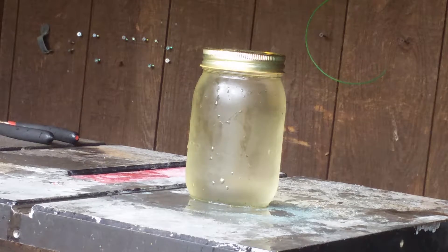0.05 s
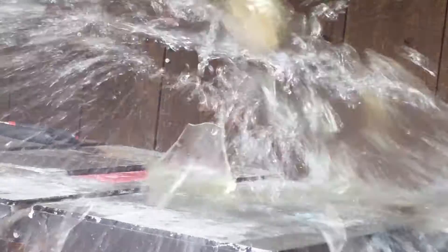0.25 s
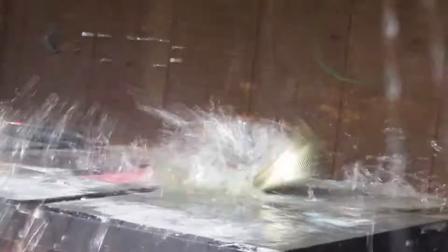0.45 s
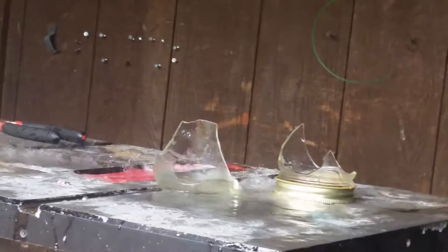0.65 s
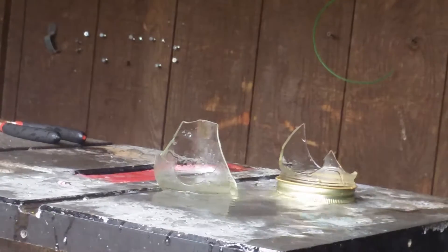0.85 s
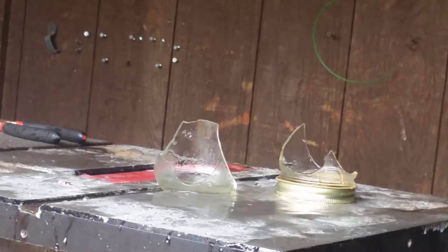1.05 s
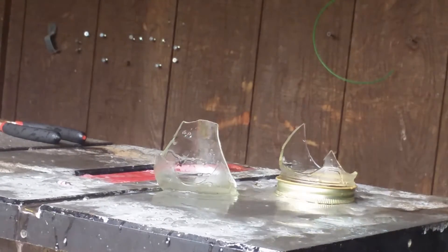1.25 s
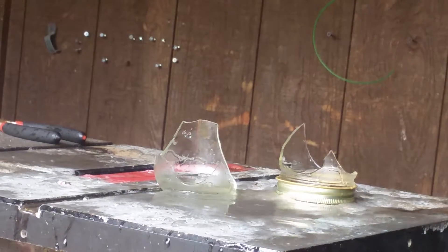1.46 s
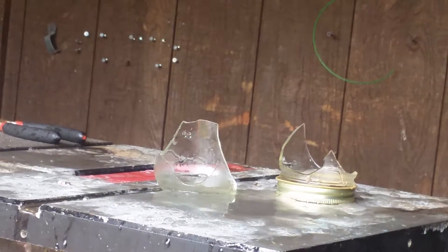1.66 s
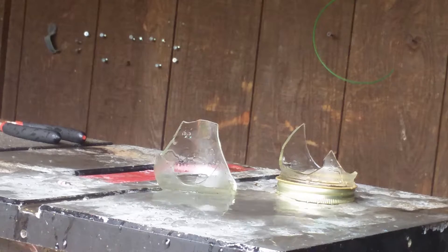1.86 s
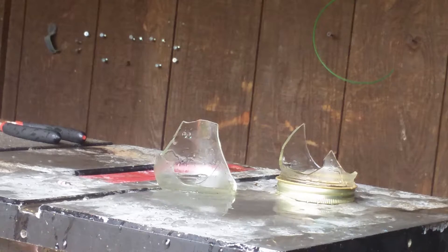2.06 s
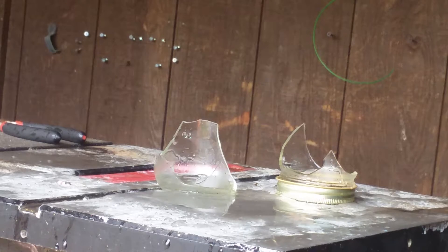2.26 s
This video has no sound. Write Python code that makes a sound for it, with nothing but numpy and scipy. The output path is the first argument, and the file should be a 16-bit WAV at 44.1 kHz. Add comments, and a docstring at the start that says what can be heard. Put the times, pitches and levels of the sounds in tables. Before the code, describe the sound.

A water-filled glass jar shatters at one loud, sharp gunshot in a yard. Water splashes, the table thumps, and bright bits of glass bounce and tinkle nearby, thinning out until only a faint outdoor rumble remains.

```python
"""A low outdoor rumble, then the crack of a bullet bursting a water-filled glass jar on a table.
Hit, blast and the slap off a wooden wall come as three noise bursts, with a spray of glass and water.
The lid and the water land and the table top booms; shards bounce and clink one by one, each ringing
in its own modes. The yard echoes. The rumble sinks after the shot and swells back at the end."""
import sys
import numpy as np
from scipy import signal
from scipy.fft import rfft, irfft
from scipy.io import wavfile

SR = 44100
rng = np.random.default_rng(int(sys.argv[2]) if len(sys.argv) > 2 else 0)


def master_out(mix):
    """Clip the mix to full scale and print it as 16-bit PCM to the path in sys.argv[1]."""
    frames = np.transpose(np.atleast_2d(mix))
    ceiling = np.clip(frames, -1, 1)
    pcm = np.round(ceiling * 32767).astype(np.int16)
    wavfile.write(sys.argv[1], SR, pcm)


N = 105840
TIME_S = np.arange(N) / SR
FREQS_HZ = np.maximum(np.fft.rfftfreq(N, 1 / SR), 1)
TOP_HZ, CONTACT_S = 15800, .0008


def undb(db):
    """Decibels to gain."""
    return 10 ** (np.asarray(db) / 20)


def pan(pan_db):
    """Stereo gains; pan_db is left minus right."""
    return undb(np.array([[pan_db], [-pan_db]]) / 2)


def decay(t60_s):
    """Exponential decay, N samples long."""
    return np.exp(-np.log(1000) * TIME_S / t60_s)


def curve_at(hz, points):
    """Interpolate (freq_hz, value) points over log frequency."""
    freqs_hz, values = np.array(points).T
    return np.interp(np.log(hz), np.log(freqs_hz), values)


def colour(x, spectrum):
    """Filter by a spectrum, keeping the power of white noise."""
    gain = undb(curve_at(FREQS_HZ, spectrum))
    return irfft(rfft(x) * gain / np.sqrt(np.mean(gain ** 2)), N)


def noise(alike_below_hz=780):
    """White stereo noise: sides alike in the bass, unrelated in the treble."""
    mid, side = rfft(rng.standard_normal((2, N)))
    coherence = .9 / (1 + (FREQS_HZ / alike_below_hz) ** 2)
    mid *= np.sqrt((1 + coherence) / 2)
    side *= np.sqrt((1 - coherence) / 2)
    return irfft(np.array([mid + side, mid - side]), N)


def add(out, start_s, x, level_db, pan_db):
    """Mix x in at a time, level and side."""
    start = int(start_s * SR)
    out[:, start:] += x[..., :N - start] * undb(level_db) * pan(pan_db)


def swells(texture, events):
    """One linear rise and exponential decay of the texture per event."""
    out = np.zeros((2, N))
    for start_s, level_db, rise_s, t60_s, pan_db in events:
        envelope = np.minimum(TIME_S / rise_s, 1) * decay(t60_s)
        stretch = np.roll(texture, -int(start_s * SR), axis=1)
        add(out, start_s, stretch * envelope / envelope.max(), level_db, pan_db)
    return out


def ring(modes, rattle_depth=0, rattle_per_s=140, length_s=.4):
    """Decaying modes of a struck object; rattling on the table wavers their level and phase."""
    t, out = TIME_S[:int(length_s * SR)], 0
    knots_s = np.arange(int(t[-1] * rattle_per_s) + 2) / rattle_per_s
    for pitch_hz, level_db, t60_s in modes:
        jitter = rng.standard_normal((2, len(knots_s))) / np.sqrt(2) * (knots_s > 0)
        waver = 1 + rattle_depth * np.interp(t, knots_s, jitter[0] + 1j * jitter[1])
        mode = np.exp((2j * np.pi * pitch_hz - np.log(1000) / t60_s) * t)
        out = out + undb(level_db) * (waver * mode).imag
    onset = np.sin(np.pi / 2 * np.minimum(t / CONTACT_S, 1)) ** 2
    return np.pad(out * onset, (0, N - len(t)))


def patter(rate_per_s=2500, spread_db=3):
    """Tiny impacts, random in time, size and side."""
    when, size, side = rng.random((int(rate_per_s * N / SR), 3)).T
    gain = undb(-spread_db * np.log(np.maximum(size, .01)))
    out = np.zeros((2, N))
    out[:, (when * N).astype(int)] = gain * np.array([np.cos(side * np.pi), np.sin(side * np.pi)])
    return out / out.std()


def chatter(x, bounces=4, gap_s=.006, bounce_gain=.45):
    """A landing piece touches again in quick succession, weaker each time."""
    out, delay = x.copy(), 0
    for k, chance in enumerate(rng.random(bounces)):
        delay += int(gap_s * (.5 + chance) * SR)
        out[delay:] += bounce_gain ** (k + 1) * x[:N - delay]
    return out


def background(split_hz=300, pan_db=1.5):
    """Outdoor rumble with a thin hiss; sinks after the shot, then swells back."""
    # freq_hz, density_db
    spectrum = [(20, -32), (35, -16.5), (72, 1.5), (160, -8), (380, -23.5), (650, -20), (1000, -29.5),
                (2000, -27.5), (5300, -45.5), (6700, -26), (8500, -46), (16000, -44.5)]
    # level contour: time_s, bass_db, treble_db
    contour = [(0, -43, -35.5), (0.218, -41, -36), (0.302, -47, -80), (1.2, -58.5, -57.5), (1.8, -62, -65),
               (2.15, -57.5, -61), (2.4, -50, -51.5)]
    times_s, bass_db, treble_db = np.array(contour).T
    air = colour(noise(), spectrum)
    bass = irfft(rfft(air) / (1 + (FREQS_HZ / split_hz) ** 4), N)
    bass_gain = undb(np.interp(TIME_S, times_s, bass_db))
    treble_gain = undb(np.interp(TIME_S, times_s, treble_db))
    return (bass * bass_gain + (air - bass) * treble_gain) * pan(pan_db)


def yard_echo(x, rise_s=.011):
    """Diffuse echo off wall and yard, with its own decay in each octave."""
    # freq_hz, t60_s
    decay_times = [(60, .3), (300, 0.6), (1500, 0.53), (5000, 0.42), (14000, 0.36)]
    spectrum, response = rfft(noise()), 0
    centres_hz = np.geomspace(60, TOP_HZ, 9)
    for centre_hz, weights in zip(centres_hz, np.eye(len(centres_hz))):
        band = irfft(spectrum * np.interp(np.log(FREQS_HZ), np.log(centres_hz), weights), N)
        response = response + band * decay(curve_at(centre_hz, decay_times))
    response *= np.minimum(TIME_S / rise_s, 1)
    response /= np.sqrt(np.sum(response ** 2) / 2)
    return signal.fftconvolve(x, response, axes=1)[:, :N]


def table_boom():
    """The table top booms under each heavy blow."""
    # pitch_hz, level_db, t60_s
    modes = [(71, -10, 0.0905), (105, 3, 0.09), (156.2, 3, 0.052), (246, -6, 0.041)]
    # start_s, level_db, pan_db
    blows = [(0.254, -25.5, 15), (0.259, -18, 14), (0.477, -27, 10), (0.52, -30.5, 8), (0.531, -28, 15.5),
             (0.882, -51.5, 2)]
    out, boom = np.zeros((2, N)), ring(modes)
    for start_s, level_db, pan_db in blows:
        add(out, start_s, boom, level_db, pan_db)
    return out


def landings(drops_db=-3):
    """Lid and sheets of water slap dully on the table, grainy with drops."""
    # start_s, level_db, rise_s, t60_s, pan_db
    slaps = [(.4765, -19, .0005, 0.044, 0.5), (.5185, -21, 0.0022, 0.42, 2.5),
             (0.726, -39.5, 0.0019, 0.19, 0.5), (.775, -40.5, .005, 1, 3), (.92, -48.5, .01, 0.12, -1.5),
             (.99, -37, .005, 0.15, -2.5), (1.123, -47.5, .012, 0.21, 0.5)]
    # freq_hz, density_db
    spectrum = [(40, -26.5), (130, 0.5), (300, 1), (800, -2.5), (1600, -3.5), (3000, -6), (6000, -13),
                (16000, -7.5)]
    return swells(colour(noise() + undb(drops_db) * patter(), spectrum), slaps)


def spray(sizes=60, ping_t60_s=.021, mist_db=2):
    """Fine glass and drops ping, each size at its own pitch, in a hiss of mist."""
    # start_s, level_db, rise_s, t60_s, pan_db
    clouds = [(0.24, -17, 0.018, 0.43, -2.5), (0.518, -28, .003, 0.15, 8), (0.553, -28.5, 0.0034, 0.17, -7)]
    # freq_hz, density_db
    spectrum = [(100, -31), (1000, -14), (3000, -14), (5200, -8.5), (8000, -2), (12000, 4.5), (16000, -3.5)]
    hits, size_of_hit = patter(), rng.integers(0, sizes, N)
    pitches_hz = np.geomspace(2500, TOP_HZ, sizes) * (1 + .02 * rng.standard_normal(sizes))
    pings, t = np.zeros((2, N)), TIME_S[:SR // 10]
    for size, pitch_hz in enumerate(pitches_hz):
        ping = np.sqrt(pitch_hz) * np.sin(2 * np.pi * pitch_hz * t) * decay(ping_t60_s)[:len(t)]
        pings += signal.oaconvolve(hits * (size_of_hit == size), ping[None], axes=1)[:, :N]
    texture = pings / pings.std() + undb(mist_db) * noise()
    return swells(colour(texture, spectrum), clouds)


def tinkle(shards=64, lowest_hz=6800, t60_s=.035, fade_db=16):
    """Showers of small shards, one pitch each; late ones are sparser and weaker."""
    # start_s, level_db, length_s
    showers = [(0.534, -30, 0.17), (.832, -24.5, 0.15)]
    out = np.zeros((2, N))
    for start_s, level_db, length_s in showers:
        for lateness, size, side in rng.random((shards, 3)):
            pitch_hz = lowest_hz * (TOP_HZ / lowest_hz) ** rng.random()
            ping = ring([(pitch_hz, 0, t60_s)]) * (.5 + size) * undb(-fade_db * lateness)
            add(out, start_s + length_s * lateness ** 2, ping, level_db, pan_db=20 * (side - .5))
    return out


def clinks(tick_t60_s=.012, knee_hz=4000, focus_width_hz=1200, off_focus_db=-9):
    """Each landing piece ticks, rings and chatters; the contact point favours modes near focus_hz."""
    # start_s, piece, ring_db, tick_db, focus_hz, pan_db
    impacts = [(0.3925, "thick", -15, -10, 10800, 2), (.405, "thick", -22, -19, 3400, 1),
               (.4765, "lid", -31.5, -30, 2407, -5.5), (0.4764, "sliver", -14, -19.5, 15300, -14),
               (.533, "lid", -23, -26, 1600, -0.5), (0.542, "shoulder", -24, -28, 4130, -3),
               (.564, "shoulder", -19.5, -26, 8690, 13.5), (0.663, "chip", -15, -17.5, 13900, 5.5),
               (.792, "flake", -15, -6.5, 14500, -2.5), (.838, "corner", -25, -21, 7750, 22),
               (0.849, "corner", -13.5, -6.5, 13900, 7.5), (0.925, "curved", -22.5, -27, 11800, 2.5),
               (0.9819, "side", -14.5, -13, 9700, 7.5), (1.014, "side", -17.5, -38, 9700, -2),
               (1.127, "curved", -31, -32, 3630, -1.5), (1.1804, "side", -20, -16, 12440, -4.5),
               (1.2, "side", -21.5, -27, 12230, 7.5), (1.246, "curved", -33, -30, 2500, 2),
               (1.267, "curved", -29.5, -22, 14700, -4), (1.287, "curved", -30.5, -28.5, 9000, 7.5),
               (1.369, "base", -31.5, -44, 5700, -3), (1.390, "base", -16, -19, 13540, 6.5),
               (1.508, "splinter", -38, -54.5, 12670, 2)]
    # per piece: pitch_hz, level_db
    piece_modes = { "lid": [(1340, -3), (1513, -4), (1690, 0), (2649, -7)], "thick": [(3290, -8), (3402, 1),
                   (3510, -7), (6395, -1), (10780, 0), (10990, -3), (15120, 2)], "sliver": [(5286, -6),
                   (14615, 0), (14800, -5)], "shoulder": [(4140, -6), (6304, -7), (8586, -4), (9200, 0),
                   (12870, 5)], "chip": [(11260, -3), (14320, -1)], "flake": [(6314, -12), (9216, -6),
                   (14615, 0), (14850, -6)], "corner": [(7130, -6), (8263, -2), (8360, -4), (9423, -6),
                   (11070, -5), (12295, 0), (13905, 1)], "curved": [(1340, -28), (3171, -15), (3628, -17),
                   (6805, -7), (7115, -7), (8670, -5), (9645, -3), (11780, 0), (13899, -4), (14680, -1)],
                   "side": [(4143, -12), (6314, -14), (7700, -3), (9657, -3), (9708, -4), (12335, 0)],
                   "base": [(3640, -19), (4143, -17), (4825, -16), (5699, -8), (6828, -15), (7622, -3),
                   (9708, -11), (12640, -9), (13570, -2), (13640, -2), (15670, -7)],
                   "splinter": [(9356, -7), (12630, 0), (14222, -1)]}
    # per piece: t60_s up to knee_hz; higher modes die sooner
    piece_t60_s = {"lid": .045, "thick": .07, "sliver": .23, "shoulder": .08, "chip": .17, "flake": .18,
                   "corner": .16, "curved": .22, "side": .19, "base": .15, "splinter": .28}
    # freq_hz, density_db
    tick_spectrum = [(200, -48), (1500, -34), (4200, -15), (8000, 0), (13000, 7.5), (16000, -4)]
    out, tick_noise = np.zeros((2, N)), colour(noise(), tick_spectrum)
    tick_envelope = np.minimum(TIME_S / CONTACT_S, 1) * decay(tick_t60_s)
    for start_s, piece, ring_db, tick_db, focus_hz, pan_db in impacts:
        modes = []
        for pitch_hz, level_db in piece_modes[piece]:
            off_focus = 1 - np.exp(-((pitch_hz - focus_hz) / focus_width_hz) ** 2)
            t60_s = piece_t60_s[piece] * min(knee_hz / pitch_hz, 1)
            modes.append((pitch_hz, level_db + off_focus_db * off_focus, t60_s))
        add(out, start_s, chatter(ring(modes, rattle_depth=.75)), ring_db, pan_db)
        tick = np.roll(tick_noise, int(start_s * SR), axis=1) * chatter(tick_envelope)
        add(out, start_s, tick, tick_db, pan_db)
    return out


def shot():
    """Three sharp pressure bursts: hit, blast, slap off the wall."""
    # start_s, level_db, t60_s, tilt_db_per_octave, pan_db
    bursts = [(0.2425, -13.5, 0.049, 1.16, -5.5), (0.2522, -7, 0.045, -1.0, 1),
              (0.2628, -9, 0.048, -0.54, 8)]
    # freq_hz, density_db
    spectrum = [(30, -8.5), (80, 1.5), (200, 1.5), (500, 1.5), (1200, -2), (2700, 1.5), (5200, -9.5),
                (8000, -9.5), (12000, -3), (16000, -14.5)]
    out = np.zeros((2, N))
    for start_s, level_db, t60_s, tilt_db_per_octave, pan_db in bursts:
        tilted = [(hz, db + tilt_db_per_octave * np.log2(hz)) for hz, db in spectrum]
        add(out, start_s, colour(noise(), tilted) * decay(t60_s), level_db, pan_db)
    return out


def scene(bang_echo_db=-7, splash_echo_db=-10, glass_echo_db=-4.5):
    """Shot, splash and glass with their echo, plus table and background."""
    bang = shot()
    splash = spray() + landings()
    glass = clinks() + tinkle()
    send = undb(bang_echo_db) * bang + undb(splash_echo_db) * splash + undb(glass_echo_db) * glass
    return bang + splash + glass + yard_echo(send) + table_boom() + background()


def record(dry, low_cut_hz=48):
    """High-pass, clip at full scale, steep low-pass."""
    high_pass = signal.butter(2, low_cut_hz, "high", fs=SR, output="sos")
    low_pass = signal.ellip(10, .2, 70, TOP_HZ, fs=SR, output="sos")
    clipped = np.clip(signal.sosfilt(high_pass, dry), -1, 1)
    return signal.sosfilt(low_pass, clipped)


dry = scene()
out = record(dry)
master_out(out)
```